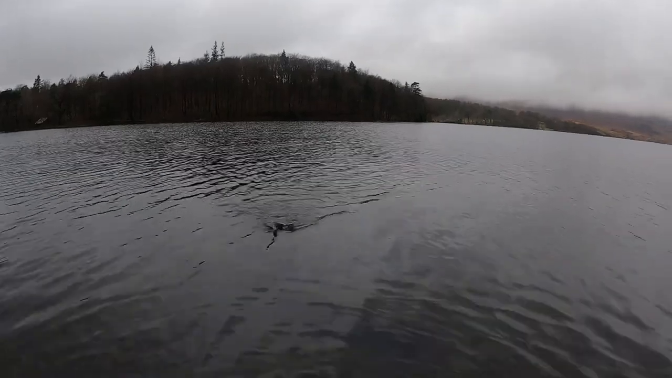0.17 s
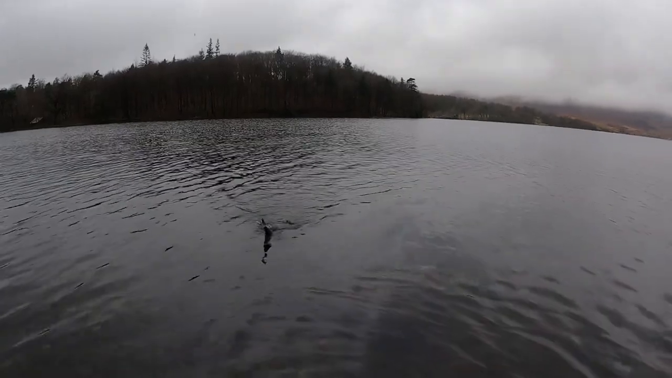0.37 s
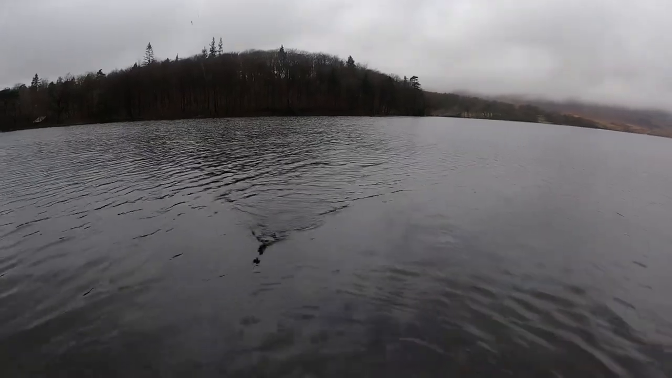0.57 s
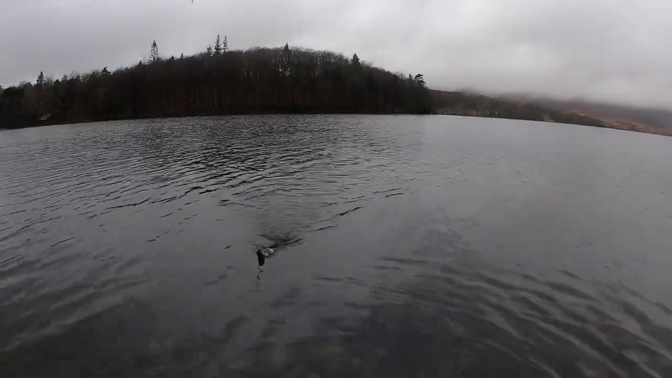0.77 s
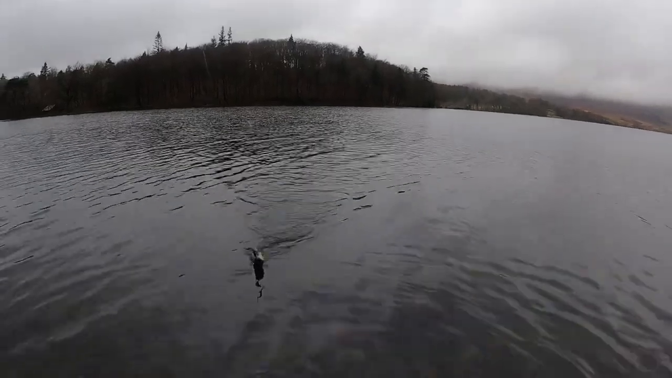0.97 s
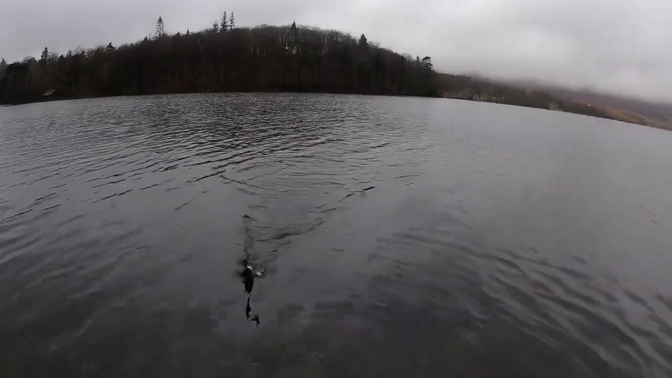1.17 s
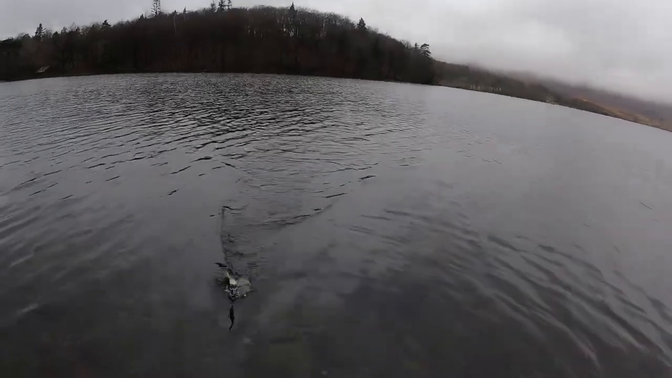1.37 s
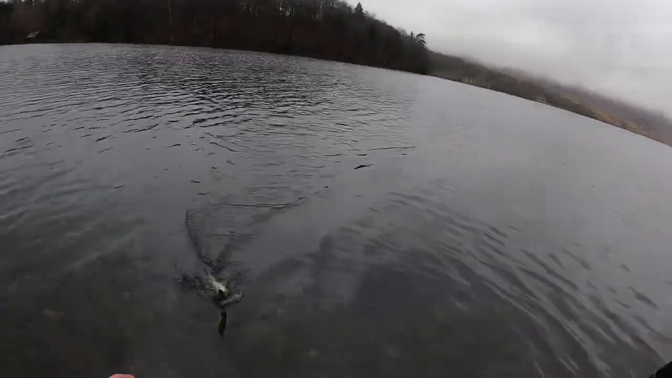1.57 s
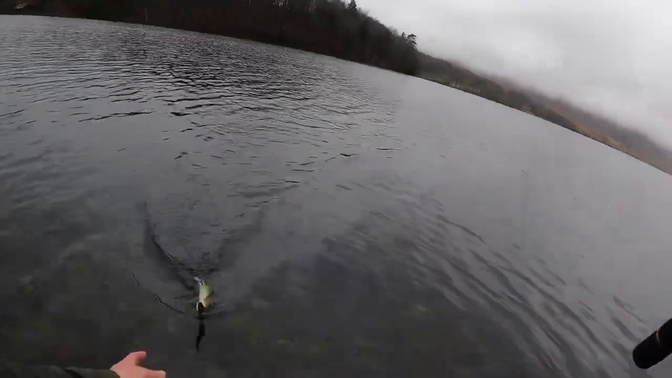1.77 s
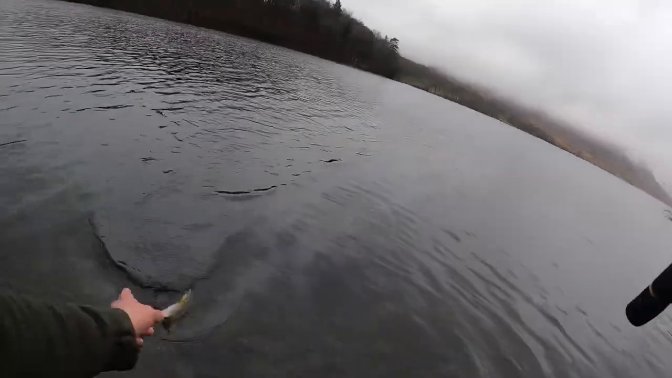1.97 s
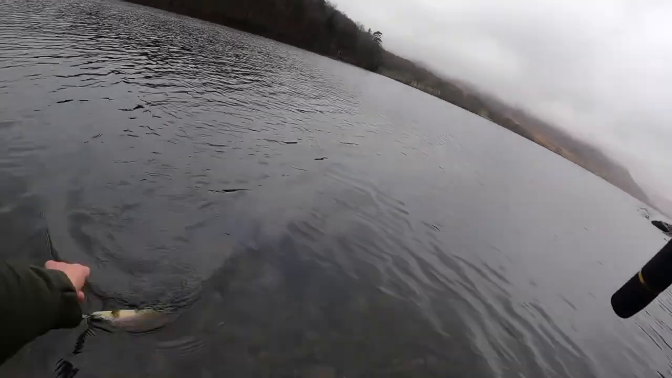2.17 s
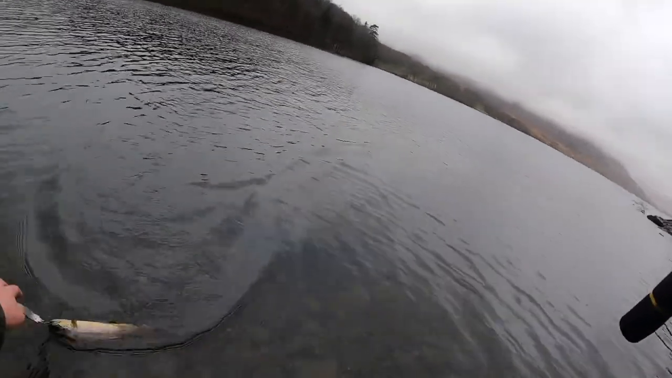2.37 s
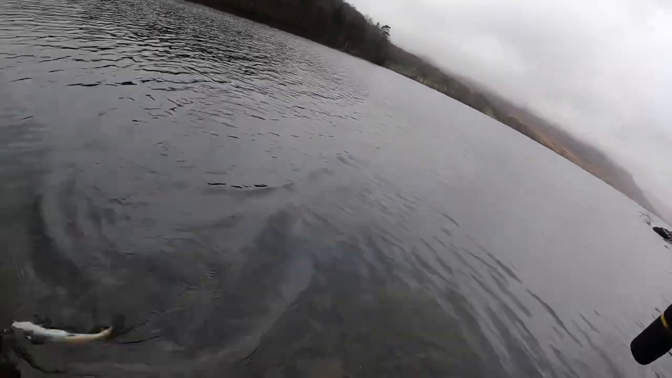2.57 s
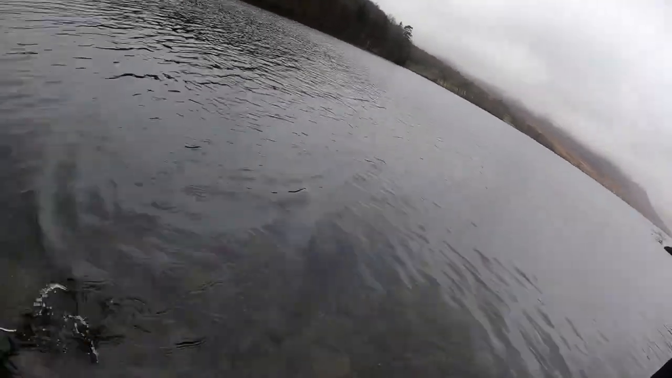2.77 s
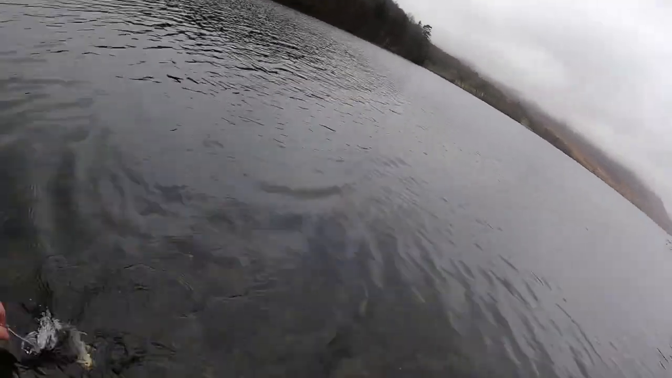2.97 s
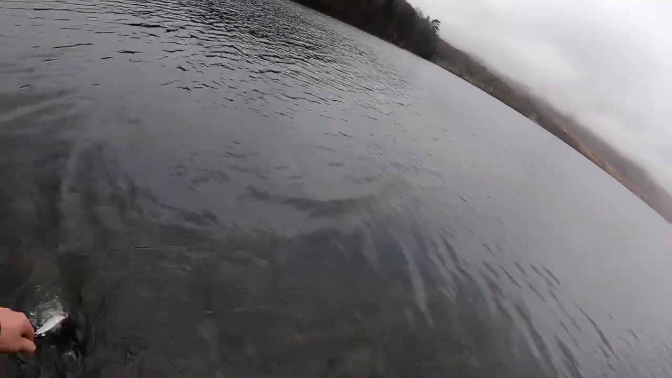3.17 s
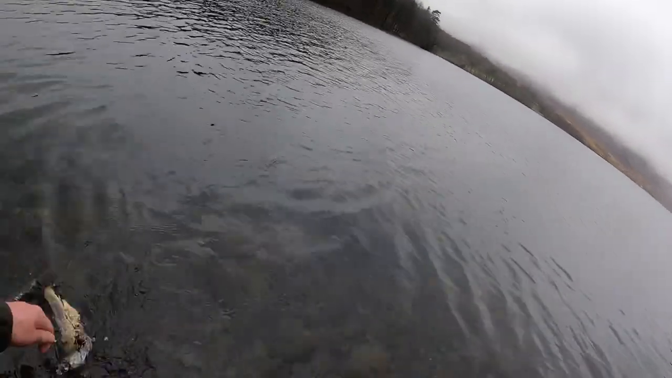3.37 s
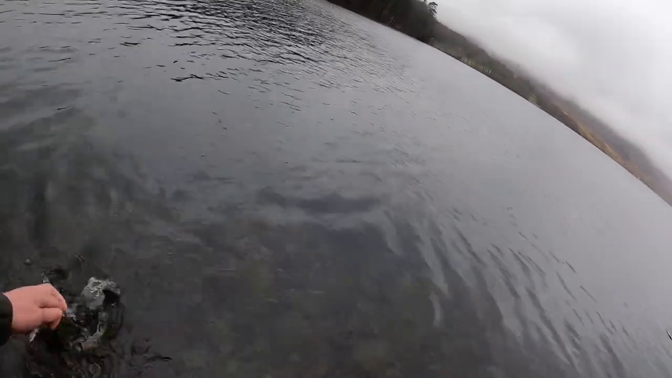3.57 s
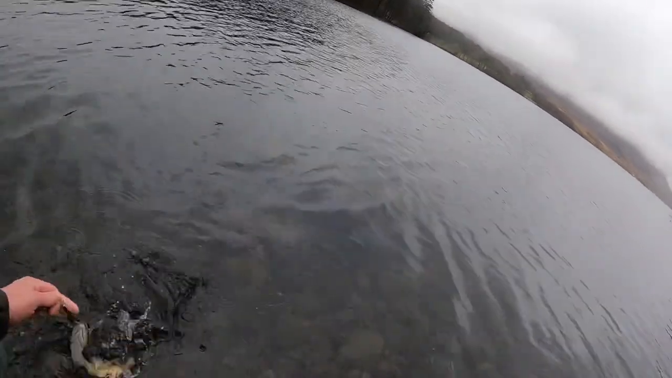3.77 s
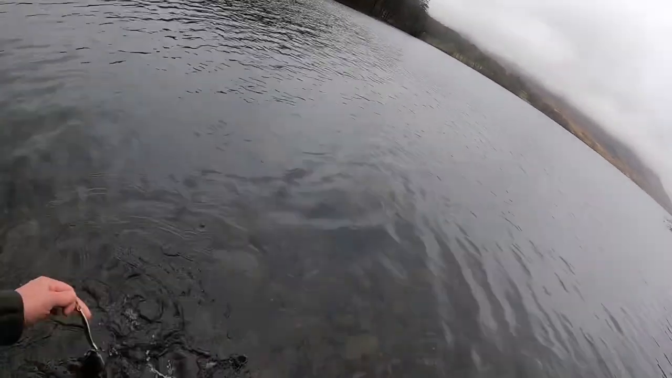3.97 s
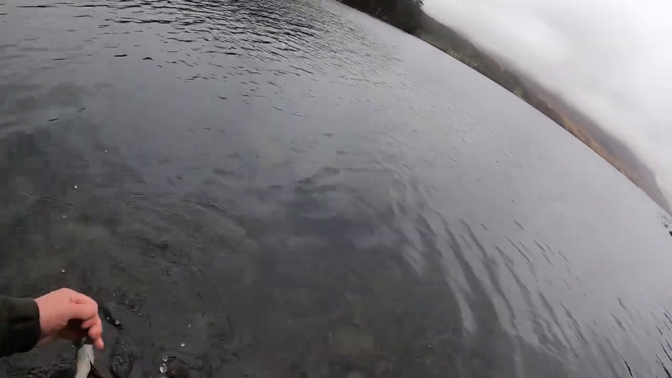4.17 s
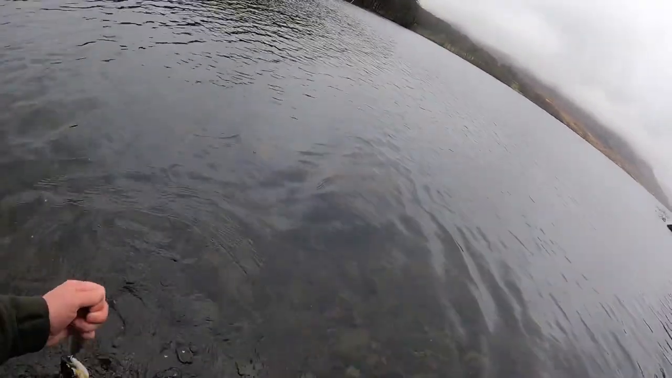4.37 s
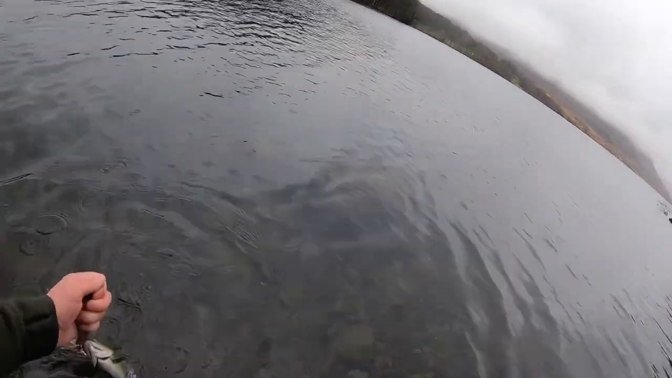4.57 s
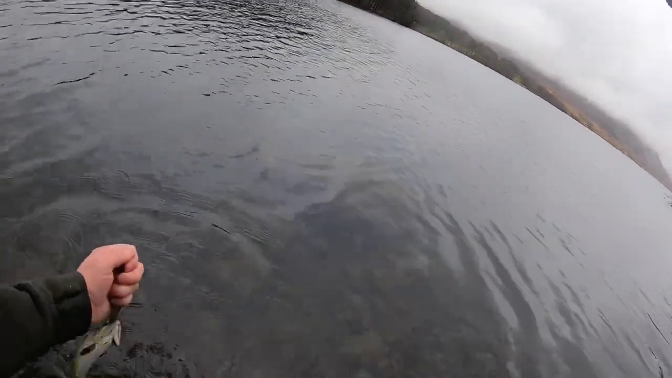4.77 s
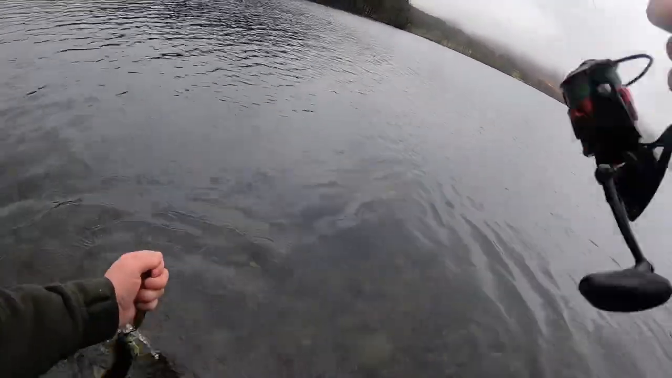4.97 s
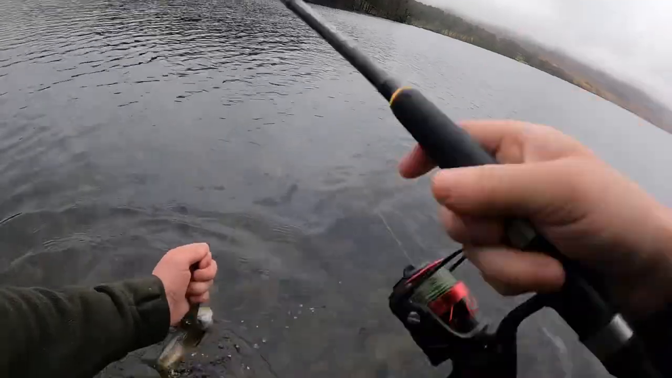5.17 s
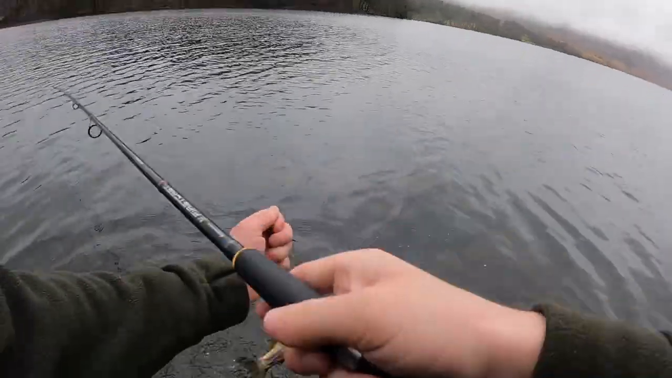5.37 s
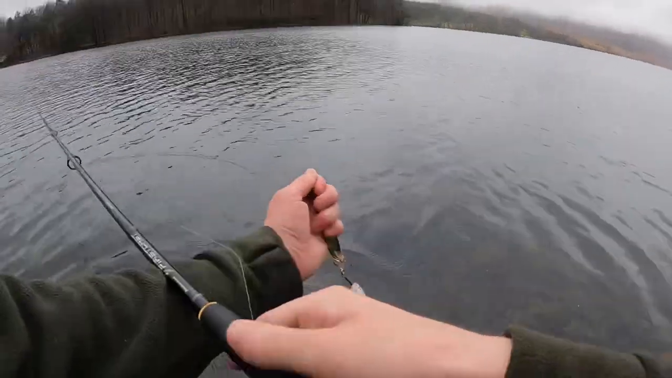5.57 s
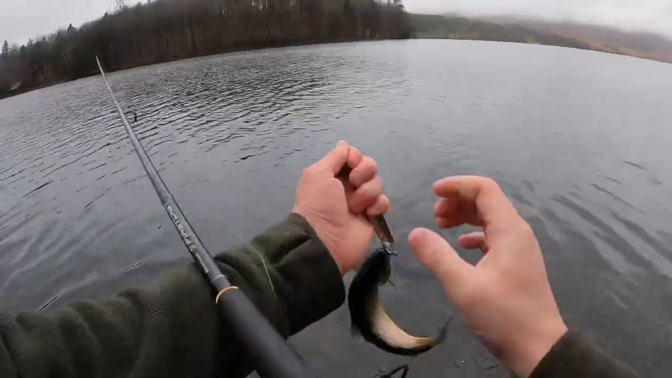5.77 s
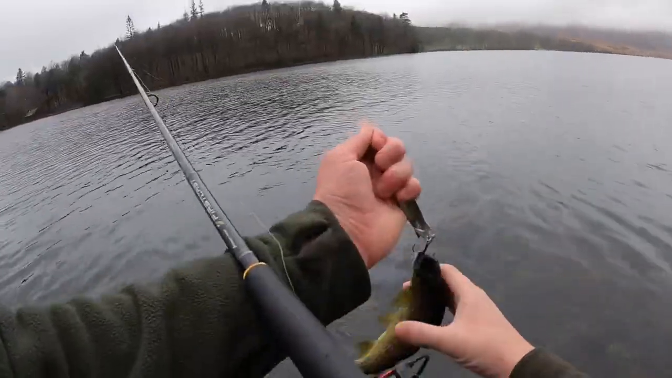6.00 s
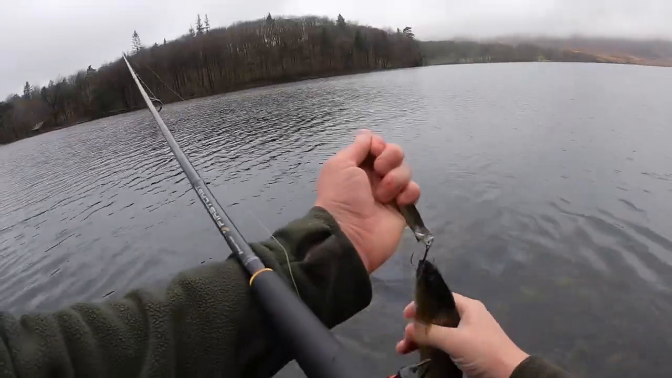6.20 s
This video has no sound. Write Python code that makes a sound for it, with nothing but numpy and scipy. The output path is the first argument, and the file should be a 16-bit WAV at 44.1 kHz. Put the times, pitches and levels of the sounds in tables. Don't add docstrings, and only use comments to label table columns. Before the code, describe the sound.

Close at a calm lake, a low wind thump and rod knock open over faint watery blips as a small fish is drawn in. After a near-quiet pause, sharp slaps and frothy splashing break out left of centre, peaking in a loud slap and a deep hollow gulp. Bubbles chirp upwards and droplets tick back, then the rod knocks and a sleeve rustles as the fish is lifted.

```python
import sys
import numpy as np
from scipy import signal
from scipy.io import wavfile

SR = 44100
rng = np.random.default_rng(int(sys.argv[2]) if len(sys.argv) > 2 else 0)


def ratio(d):
    e = np.asarray(d, float) / 20
    return 10 ** e


def inscribe(sig):
    pcm = np.round(np.clip(np.atleast_2d(sig).T, -1, 1) * 32767)
    wavfile.write(sys.argv[1], SR, pcm.astype(np.int16))


N = 275000
HOOK = 0.3


def rms_one(x):
    return x / np.sqrt(np.mean(x ** 2) + 1e-20)


def in_time(rows):
    s, level = np.transpose(rows)
    return np.interp(np.arange(N) / SR, s, level)


def at_hz(points, hz):
    point_hz, value = np.transpose(points)
    return np.interp(np.log(hz), np.log(point_hz), value)


def drift(rate_hz):
    r = np.exp(-80 * np.pi * rate_hz / SR)
    white = rng.standard_normal(N // 40 + 2002)
    slow = signal.lfilter([1], [1, -2 * r, r * r], white)[2000:]
    return np.interp(np.arange(N) / 40, np.arange(len(slow)), rms_one(slow))


def sides(pan_db):
    return ratio(np.array([pan_db / 2, -pan_db / 2]))


def fish_side(s, hz):
    # time_s, left_over_right_db
    path = [
        (0, -1),
        (1.7, 4),
        (2.7, 6.5),
        (3.6, 3.5),
        (3.82, 3),
        (4.45, 4),
        (4.9, 3.5),
        (5.1, 3.5),
        (6.24, 0.5),
    ]
    return np.interp(s, *np.transpose(path)) * (hz / 5000) ** 0.45


def rings(s, height, hz, pan_db, cycles, rise, phase, size, hook=0):
    settle_cycles = 1.4
    turns = np.arange(size) / SR * hz[:, None]
    swell = 1 - np.exp(-turns / 0.4)
    fade = swell * ratio(-60 * turns / cycles[:, None]) * np.linspace(1, 0, size)
    swept = turns * (1 + rise[:, None] / 200 * np.minimum(turns, cycles[:, None]))
    swept = swept + hook * settle_cycles * (1 - np.exp(-turns / settle_cycles))
    wave = height[:, None] * fade * np.sin(2 * np.pi * swept + phase[:, None])
    at = (np.round(s * SR).astype(int)[:, None] + np.arange(size)).ravel()
    channels = []
    for gain in sides(pan_db):
        channels.append(np.bincount(at, (gain[:, None] * wave).ravel(), N + size + SR)[:N])
    return np.array(channels)


def swarm(low_hz, high_hz, cycles, spread_db, wide_db, count, size):
    when, pitch, big, long, rise, phase, place = rng.random((count, 7)).T
    height = ratio(spread_db * np.minimum(-np.log(big + 1e-9), 3))
    s = when * N / SR
    hz = low_hz * (high_hz / low_hz) ** pitch
    life = cycles * (0.3 + 1.4 * long)
    glide = 2.2 * rise ** 2 - 0.4
    pan_db = fish_side(s, hz) + wide_db * (place - 0.5)
    return rms_one(rings(s, height, hz, pan_db, life, glide, 2 * np.pi * phase, size))


def churn(kind, rise_db_s, fall_db_s):
    # start_s, lasts_s, froth_db, spray_db
    flicks = [(0.0, 0.012, -36, -64.5), (0.151, 0.12, -52, -74), (0.385, 0.074, -54, -79),
              (0.632, 0.12, -56.5, -84), (0.864, 0.14, -79, -79.5), (1.067, 0.015, -50, -77),
              (1.139, 0.087, -60, -73), (1.273, 0.012, -52, -70.5), (1.356, 0.25, -65, -78),
              (1.507, 0.073, -58.5, -70.5), (1.67, 0.024, -70, -71), (2.786, 0.1, -46.5, -61.5),
              (3.033, 0.11, -48.5, -61.5), (3.199, 0.033, -37, -56.5), (3.295, 0.053, -49, -55),
              (3.346, 0.063, -45.5, -77), (3.487, 0.12, -52, -63.5), (3.561, 0.1, -37, -58),
              (3.705, 0.068, -48, -57.5), (3.764, 0.045, -37.5, -55), (3.807, 0.01, -28, -44.5),
              (3.883, 0.089, -55, -58.5), (4.021, 0.0049, -41.5, -56), (4.097, 0.13, -53, -70.5),
              (4.253, .18, -50.5, -61.5), (4.593, 0.009, -49, -57.5), (4.676, 0.11, -50, -70),
              (4.841, 0.072, -42.5, -60.5), (4.99, 0.038, -85, -64), (5.101, 0.076, -65, -59.5),
              (5.251, 0.36, -56.5, -64), (5.71, 0.011, -75, -60)]
    s, lasts, froth_db, spray_db = np.transpose(flicks)
    db = {"froth": froth_db, "spray": spray_db}[kind]
    after = np.arange(0, N, 32)[:, None] / SR - s
    loss_db = np.maximum(0, np.maximum(fall_db_s * (after - lasts), -rise_db_s * after))
    power = np.sum(ratio(db - loss_db) ** 2, axis=1)
    return np.interp(np.arange(N) / 32, np.arange(len(power)), np.sqrt(power))


def froth():
    bubbling = swarm(750, 4200, cycles=44, spread_db=4, wide_db=22, count=3000, size=900)
    return bubbling * churn("froth", rise_db_s=3500, fall_db_s=330) / 2


def spray():
    drops = swarm(2500, 11500, cycles=38, spread_db=3.5, wide_db=14, count=2600, size=230)
    coarse = swarm(1800, 6000, cycles=11, spread_db=3.5, wide_db=12, count=7000, size=90)
    fine = swarm(5000, 13000, cycles=17, spread_db=3.5, wide_db=32, count=8000, size=60)
    handfuls = drift(13)
    coarse = coarse * ratio(3.5 * handfuls + 3 * drift(60))
    fine = fine * ratio(3.5 * handfuls + 3 * drift(60))
    patter = ratio(5.0) * drops + ratio(-0.5) * coarse + ratio(2.7) * fine
    calm_db = -83
    return patter * (churn("spray", rise_db_s=4000, fall_db_s=240) + ratio(calm_db))


def pockets():
    # time_s, pitch_hz, rms_db
    pocket_paths = [
        [(0.0, 437, -38), (0.03, 581, -44), (0.06, 610, -57), (0.07, 680, -73)],
        [(3.570, 467, -88), (3.573, 470, -30), (3.6, 438, -40.5), (3.615, 528, -38.5), (3.628, 1024, -39),
         (3.636, 1110, -43)],
        [(4.0205, 330, -44), (4.0268, 259, -13), (4.035, 230, -18.5), (4.14, 300, -34), (4.19, 309.3, -36),
         (4.245, 360.5, -44), (4.27, 420, -48.5), (4.305, 664, -51.5), (4.34, 810, -67)],
        [(4.17, 365, -65), (4.178, 368, -50), (4.22, 416, -46.5), (4.25, 468, -51), (4.27, 576, -50),
         (4.3, 925, -39), (4.318, 1300, -47), (4.325, 1357, -73)],
        [(4.596, 794, -44.5), (4.602, 1260, -31), (4.6055, 1600, -43)],
        [(4.865, 475, -53), (4.881, 850, -28.5), (4.893, 1000, -51), (4.9, 1020, -66)],
        [(4.03, 905, -40), (4.045, 907, -60), (4.065, 1000, -58)],
        [(1.068, 815, -71), (1.072, 772, -58), (1.09, 1060, -55), (1.097, 1150, -87)],
        [(5.545, 565, -99), (5.548, 578, -31.5), (5.6, 613, -48.5), (5.635, 790, -47.5), (5.66, 1290, -51.5),
         (5.672, 1430, -82)],
    ]
    out = np.zeros(N)
    wobble = drift(28.0)
    for rows in pocket_paths:
        t = np.arange(round(rows[0][0] * SR), round(rows[-1][0] * SR))
        s, hz, db = np.transpose(rows)
        pitch_hz = np.exp(np.interp(t / SR, s, np.log(hz)) + 0.008 * wobble[t])
        phase = 2 * np.pi * np.cumsum(pitch_hz) / SR
        out[t] += np.sqrt(2) * ratio(np.interp(t / SR, s, db)) * np.sin(phase)
    return signal.sosfilt(signal.butter(4, 165, "high", fs=SR, output="sos"), out)


def wind():
    # time_s, level_db
    gusts = [(0.0, -21.5), (0.229, -62.5), (0.389, -47), (0.7, -53.5), (0.98, -43), (1.25, -59.5),
             (2.2, -56), (2.5, -68), (2.863, -53), (3.15, -90), (3.53, -43.5), (3.85, -67), (4.49, -52.5),
             (5.2, -69), (5.328, -56), (5.517, -60), (6.0, -46.5), (6.226, -70)]
    shared, own = rng.standard_normal((2, N))
    ports = [0.66 * shared + 0.36 * own, 1.25 * shared - 0.36 * own]
    low = signal.sosfilt(signal.butter(2, [9, 60], "band", fs=SR, output="sos"), ports)
    return ratio(in_time(gusts) + 1.15 * drift(8.1)) * rms_one(low)


def banded_noise(spectrum, patchy_db):
    # frequency_hz, likeness (1 = the same)
    likeness = [(60, 1), (180, 0.99), (550, 0.83), (1650, 0.44), (4970, 0.95), (15000, 0.22)]
    out = 0
    edges = 60 * 2 ** np.arange(0, 8.6, 0.5)
    white = rng.standard_normal((2, 2, N))
    for k, (low, high) in enumerate(zip(edges, edges[1:])):
        band = signal.butter(2, [low, high], "band", fs=SR, output="sos")
        mid, side = signal.sosfilt(band, white[k % 2])
        hz = np.sqrt(low * high)
        alike = np.clip(at_hz(likeness, hz), 0, 1)
        gain = ratio(at_hz(spectrum, hz) + patchy_db * drift(33))
        out = out + gain * (np.sqrt(1 + alike) * mid + np.sqrt(1 - alike) * side * [[1], [-1]])
    return rms_one(out)


def lake_air():
    # frequency_hz, level_db (per Hz)
    shore = [(60, 19), (118, -39), (146, 9), (207, 0), (255, -1.5), (943, -25.5), (1060, -16.5),
             (1770, -17), (2340, -24), (6700, -100), (9080, -71), (12000, -35), (15900, -66)]
    return ratio(-55 + 1.0) * banded_noise(shore, patchy_db=2.5)


def knocks():
    # start_s, peak_db, body_hz
    knock_rows = [
        (0.009, -21, 55.6),
        (0.114, -31, 45.7),
        (5.312, -33.5, 81.5),
        (5.321, -28.5, 106),
        (5.334, -31.5, 48.7),
        (5.362, -35, 51),
        (5.517, -34.5, 163),
        (5.588, -28.5, 110),
        (5.843, -35, 68),
    ]
    s, db, hz = np.transpose(knock_rows)
    none = 0 * s
    pull = rings(s, ratio(db + 15.0), hz, none - 2.5, none + 2.0, none, none, size=4000)
    mode = rings(s, ratio(db - 8.0), 230 + 0.64 * hz, none, none + 24.0, none, none, size=4000)
    return mode - pull


def bubbles():
    # start_s, peak_db,
    # pitch_hz, cycles (to die 60 dB)
    slaps = [(0.443, -16, 2220, -2.5), (0.856, -34.5, 2730, 12), (1.5814, -21, 4800, 3.5),
             (2.728, -13.5, 3200, -3), (2.792, -11, 2980, 1), (2.8075, -9, 1160, -1),
             (2.8271, -23.5, 5130, 7), (3.097, -19, 1390, 9), (3.2425, -9, 9650, 4),
             (3.375, -21.5, 1120, 7.5), (3.572, -16, 2360, 2.5), (3.5209, -18.5, 1390, 4),
             (2.789, -13.5, 2300, -0.5), (3.8251, -3.5, 1880, 11), (3.8255, -7.5, 5370, 13),
             (3.8243, -4, 1140, 12), (4.013, -37, 9500, 20), (4.024, 4, 8200, 1),
             (4.0236, -14.5, 2230, 13.5), (4.6985, -11, 5800, 0.5), (4.8514, -17, 485, 8),
             (4.994, -20, 6130, 6), (5.1297, -8.5, 6400, 5.5), (5.3252, -12, 960, 1.5),
             (5.3384, -15, 1490, 1.5), (5.579, -23, 285, 14), (5.7651, -21, 350, 5.5),
             (5.7808, -23, 320, 6), (5.874, -20.5, 334, 8.5), (3.571, -23, 540, 6.5),
             (5.3537, -17, 6700, 9.5)]
    # start_s, peak_db, pitch_hz, rise_percent_per_cycle
    plops = [(0.02, -26, 1330, -3.5), (0.4437, -35.5, 636, -0.5), (0.4452, -34, 3380, 2),
             (1.0672, -30, 1570, -0.7), (1.587, -35, 5900, 10), (1.6945, -34, 3150, -1.2),
             (2.7893, -29, 4130, 3), (2.8076, -15.5, 6360, -2), (2.8089, -17.5, 2410, 0.4),
             (3.223, -27.5, 970, 3), (3.3335, -25, 4630, -2), (3.3456, -24.5, 3800, -3),
             (3.6231, -30, 1025, 11), (3.6553, -24.5, 7040, -2), (3.6674, -21.5, 4760, 1),
             (3.804, -26, 2040, -3), (3.8076, -35, 1270, -2), (3.9148, -25.5, 3000, 6),
             (4.023, -18.5, 1064, 2.5), (4.2848, -29, 7600, -3.5), (4.6067, -28, 720, 6),
             (0.204, -38, 1660, 11), (0.284, -45, 1690, 8), (4.8636, -26.5, 2460, 5),
             (5.0358, -27, 4780, 15), (5.266, -28, 4400, -3), (5.3134, -27, 5940, -2),
             (5.3136, -28.5, 1140, -6), (5.3247, -26.5, 2570, -1)]
    # start_s, peak_db, pitch_hz, rise_percent_per_cycle
    plinks = [(0.168, -35.5, 1250, 4), (0.5768, -40.5, 1770, -0.7), (0.6556, -41, 3480, -0.9),
              (1.193, -31, 2790, 1.6), (1.279, -33, 2580, -0.3), (1.7166, -40.5, 3080, -0.3),
              (2.7281, -29, 1056, 1.1), (2.7885, -37.5, 1020, -2.1), (2.8078, -36, 880, 0.5),
              (2.8278, -30.5, 2500, 0.5), (2.8659, -26.5, 2720, -0.3), (2.8912, -34.5, 2900, -0.5),
              (2.933, -33.5, 1810, 0.6), (3.036, -31.5, 1305, -0.5), (3.043, -35.5, 1100, 0),
              (3.0965, -31.5, 1108, 0), (3.2034, -30.5, 7500, -1.5), (3.3467, -21, 4930, 1),
              (3.7834, -25, 3870, 0.5), (3.8319, -25, 2040, 1), (3.8344, -25, 5300, -1),
              (3.8442, -29, 4970, 0), (4.328, -32.5, 4870, 3.5), (4.3549, -33.5, 2480, 0),
              (4.3834, -33, 3700, -1), (4.6025, -33.5, 4960, 2), (4.8489, -25, 935, 0.5),
              (4.8607, -30, 1010, -2.5), (4.494, -38.5, 1200, 0.5), (3.847, -22.5, 1770, 1.2),
              (2.753, -43, 2020, 2), (4.9957, -28.5, 2790, 5), (5.133, -27.5, 3650, 2.5),
              (5.1685, -36, 7550, 0.5)]
    s, db, hz, cycles = np.transpose(slaps)
    cycles = np.maximum(cycles, 3)
    sag = -24 / cycles
    out = rings(s, ratio(db), hz, fish_side(s, hz), cycles, sag, 0 * s + 0.5, size=1200)
    for rows, ring_cycles in (plops, 29.8), (plinks, 68):
        s, db, hz, rise = np.transpose(rows)
        pan_db = fish_side(s, hz)
        out = out + rings(s, ratio(db), hz, pan_db, ring_cycles + 0 * s, rise, 0 * s + 0.5, size=2800, hook=HOOK)
    return out


def droplets():
    # start_s, peak_db, pitch_hz
    ticks = [(0.0314, -40, 3760), (0.2669, -45.5, 3700), (0.14, -46, 4500), (0.375, -51.5, 4170),
             (0.478, -51, 4560), (0.8521, -49, 1880), (1.299, -48, 3830), (1.3764, -44, 2830),
             (1.4183, -47, 3430), (2.911, -44, 2820), (3.713, -43, 3580), (3.012, -44.5, 4600),
             (2.7867, -36, 1030), (2.9323, -44, 4800), (3.0436, -38, 5810), (3.1084, -38, 6600),
             (3.1209, -36.5, 4770), (3.1309, -41, 1920), (3.1329, -38, 5430), (3.1937, -42, 1900),
             (3.2182, -36, 2690), (3.2411, -39, 4830), (3.2546, -35, 4610), (3.29, -34.5, 4900),
             (3.3554, -35, 5200), (3.3584, -36.5, 2100), (3.4023, -42, 3220), (3.4811, -38, 7000),
             (3.5729, -31, 2830), (3.5903, -35.5, 5270), (3.6093, -35, 2420), (3.6542, -32, 4400),
             (3.6886, -35, 2860), (3.6956, -32, 6800), (3.6966, -32.5, 1260), (3.8772, -38, 4030),
             (3.8991, -32.5, 3350), (3.9575, -39, 2530), (4.0313, -34, 6860), (4.0353, -33, 3820),
             (4.0842, -45, 7100), (4.2329, -42.5, 3000), (4.2783, -40, 646), (4.3516, -40.5, 1530),
             (4.6589, -42, 5120), (4.8255, -36.5, 6850), (4.837, -36, 2450), (4.8809, -40, 1460),
             (4.9532, -35.5, 5270), (4.9697, -37, 5860), (5.1014, -36, 5030), (5.1982, -37.5, 3690),
             (5.4471, -39, 3850), (4.064, -41, 1800)]
    # start_s, peak_db, pitch_hz
    blips = [(0.2734, -49.5, 1010), (1.1703, -46, 7290), (1.2781, -45, 7500), (1.6802, -48, 6600),
             (2.5966, -53, 6470), (2.8829, -38, 6800), (2.9169, -39, 2550), (3.101, -41, 5700),
             (3.2351, -36, 5350), (3.2356, -32, 9600), (3.3229, -34, 5300), (3.3758, -38, 5980),
             (3.3763, -40, 11940), (3.4886, -38, 10000), (3.5844, -36, 2800), (3.5993, -32, 1190),
             (3.6203, -35, 5090), (3.6332, -34.5, 9750), (3.6692, -43, 1640), (3.7036, -35.5, 10620),
             (3.8054, -34, 920), (3.8103, -30, 10200), (3.8991, -37, 6780), (3.964, -38, 8650),
             (4.1271, -46, 8060), (4.1281, -41.5, 2690), (4.3252, -37, 3100), (4.392, -36, 5370),
             (4.4045, -38.5, 1470), (4.4075, -35.5, 9900), (4.408, -43, 3500), (4.4185, -40, 5900),
             (4.5122, -41.5, 7600), (4.623, -38.5, 6430), (4.6824, -41, 6200), (4.6908, -37, 4800),
             (4.7971, -39.5, 6280), (5.1169, -33, 7200), (5.2675, -41, 8020), (5.4701, -39, 8580),
             (5.4751, -38.5, 7900), (5.7265, -39.5, 5640)]
    # start_s, peak_db, pitch_hz
    gurgles = [(0.1452, -46.5, 3630), (0.3153, -48.5, 2830), (1.5545, -47, 3670), (1.5689, -46.5, 3160),
               (1.6034, -46, 2070), (0.385, -51, 1640), (0.422, -56, 2020), (1.315, -51.5, 2080),
               (3.096, -39, 2820), (3.1329, -41, 4040), (3.2217, -36, 3380), (3.249, -42, 690),
               (3.292, -41.5, 583), (3.649, -34.5, 686), (4.801, -45, 1370), (3.4048, -40, 4000),
               (3.4227, -44, 3390), (3.5674, -39, 512), (3.5709, -37, 1880), (3.5898, -35, 1190),
               (3.6208, -30, 772), (3.6537, -40, 1520), (3.8428, -30, 3700), (4.2623, -44, 2830),
               (4.5891, -47, 2270), (4.6963, -40.5, 1720), (4.7293, -47, 2380), (5.3129, -38, 4250),
               (5.4766, -40, 3330), (3.866, -32, 2080), (3.868, -35, 1530), (3.354, -38.5, 1730)]
    out = 0
    for rows, cycles, gain_db in (ticks, 40, 3.0), (blips, 75, 1.5), (gurgles, 55, 2.5):
        s, db, hz = np.transpose(rows)
        none = 0 * s
        pan_db = fish_side(s, hz)
        ring = rings(s, ratio(db + gain_db), hz, pan_db, none + cycles, none + 0.27, none + 0.5, size=1000)
        landing = rings(s, ratio(db + 4), 6000 + hz / 2, pan_db, none + 3, none - 20, none, size=40)
        out = out + ring + landing
    return out


def trickles():
    # start_s, peak_db, pitch_hz, rise_percent_per_cycle
    chirps = [(3.337, -32, 2340, 1.3), (3.59, -27, 1620, 0.46), (3.639, -27.5, 1336, 0.69),
              (3.8094, -21.5, 4750, 1.33), (3.555, -36, 1610, 1.8), (4.722, -39.5, 713, 1.5),
              (1.243, -47, 1040, 1.3), (4.3667, -26, 7000, 1.07), (5.445, -44, 1880, .8),
              (5.458, -38, 2540, 0.7), (5.473, -31, 4160, 1), (5.524, -31, 2190, 2.4)]
    # start_s, peak_db, pitch_hz
    wake = [(.035, -45, 3730), (0.083, -38, 730), (1.059, -44, 1870), (0.213, -41.5, 4220),
            (0.289, -42, 2500), (0.678, -43, 1120), (1.22, -46, 960), (0.728, -40, 1370),
            (1.145, -37.5, 1166), (1.17, -41, 2700), (1.328, -41.5, 946), (1.376, -41, 1030),
            (1.538, -37.5, 2580), (1.6, -39.5, 1470)]
    # start_s, peak_db, pitch_hz
    runoff = [(2.913, -35, 2680), (3.132, -38.5, 813), (3.16, -38.5, 600), (3.197, -40, 1300),
              (3.404, -37, 1340), (3.521, -41, 1620), (3.689, -29.5, 966), (3.751, -27, 1230),
              (3.875, -36, 544), (3.939, -27, 4420), (4.093, -38, 756), (4.118, -40, 710),
              (4.205, -40, 890), (4.148, -32.5, 1300), (4.183, -32, 4290), (4.406, -36, 1055),
              (3.668, -32.5, 1620), (4.928, -42, 1060), (4.952, -43.5, 964), (4.643, -38.5, 2640),
              (4.698, -36.5, 1370), (4.761, -43, 1330), (4.861, -25.5, 1397), (4.8992, -26.5, 1217),
              (5.149, -27.5, 3430), (5.199, -36, 2240), (5.278, -35.5, 950), (5.369, -35.5, 957)]
    gentle_rise = 0.22
    rows = list(chirps)
    for row in list(wake) + list(runoff):
        rows.append((*row, gentle_rise))
    s, db, hz, rise = np.transpose(rows)
    none = 0 * s
    pan_db = fish_side(s, hz)
    ring = rings(s, ratio(db - 4.5), hz, pan_db, none + 103.0, rise, none + 0.5, size=2000, hook=HOOK)
    pinch = rings(s, ratio(db - 12), 3 * hz, pan_db, none + 3, none - 20, none, size=100)
    return ring + pinch


def sleeve():
    # time_s, level_db
    rustle = [(1.6, -69), (1.95, -56.5), (2.3, -65.5), (4.9, -65), (5.2, -58.5), (5.43, -49.5), (5.57, -46),
              (5.68, -55.5), (5.73, -51.5), (5.88, -46), (6.24, -59)]
    # frequency_hz, level_db (per Hz)
    cloth = [(88, -57), (150, -1), (278, 0.5), (866, -15), (1070, -12.5), (6550, -19), (12100, -37.5),
             (13900, -15), (15000, -68)]
    return ratio(in_time(rustle)) * banded_noise(cloth, patchy_db=2.5)


def scene():
    water = froth() + spray() + pockets() + bubbles() + droplets() + trickles()
    close_by = wind() + knocks() + sleeve()
    return water + close_by + lake_air()


def roll_off(x):
    return signal.sosfilt(signal.butter(12, 16050, fs=SR, output="sos"), x)


def record(dry):
    soft = signal.sosfilt(signal.butter(7, 13300, fs=SR, output="sos"), dry)
    return roll_off(soft)


dry = scene()
out = record(dry)
inscribe(out)
```